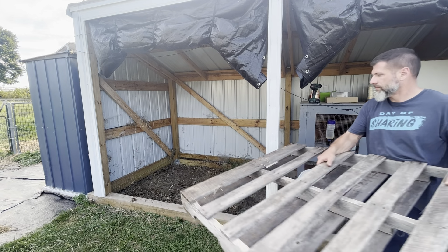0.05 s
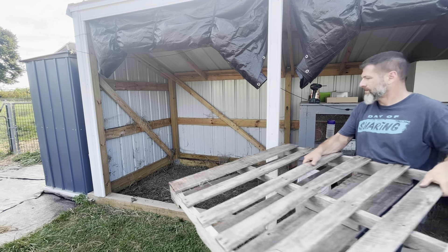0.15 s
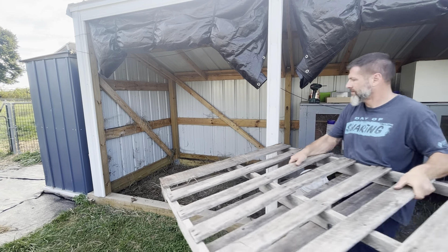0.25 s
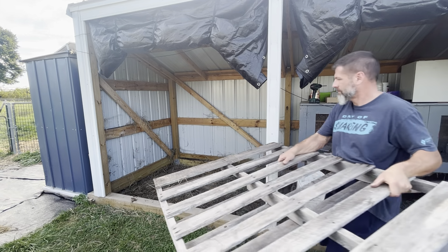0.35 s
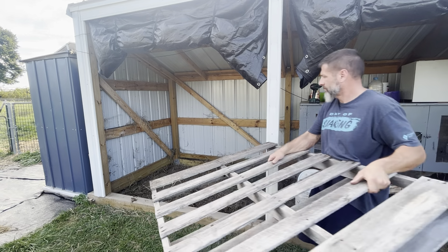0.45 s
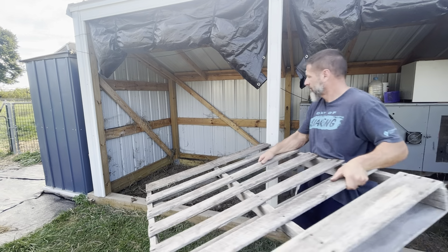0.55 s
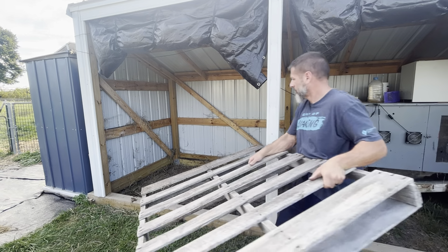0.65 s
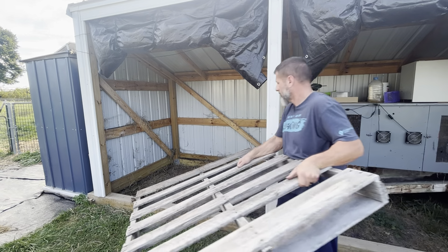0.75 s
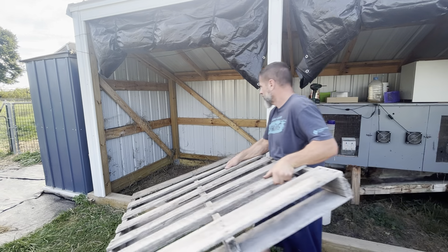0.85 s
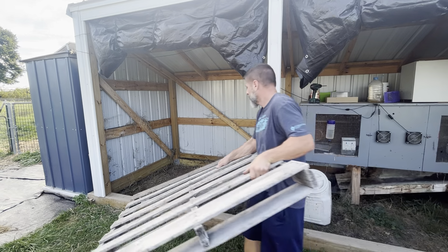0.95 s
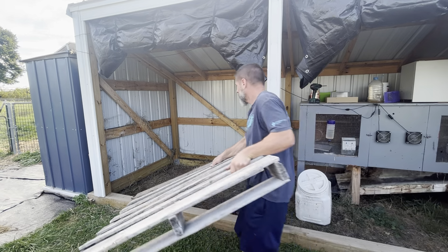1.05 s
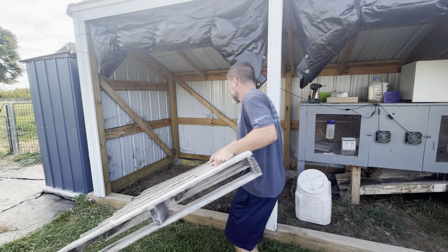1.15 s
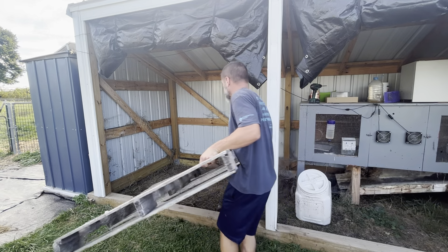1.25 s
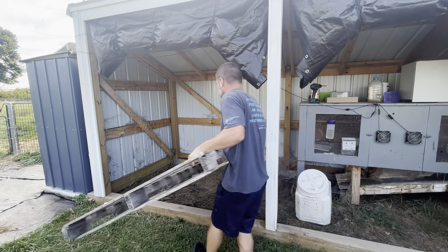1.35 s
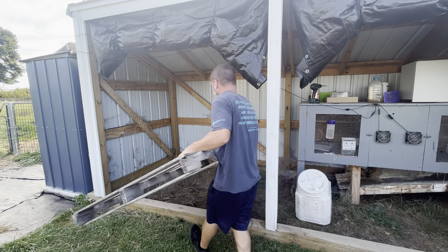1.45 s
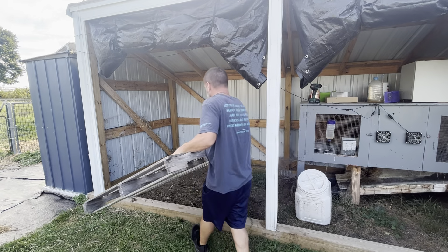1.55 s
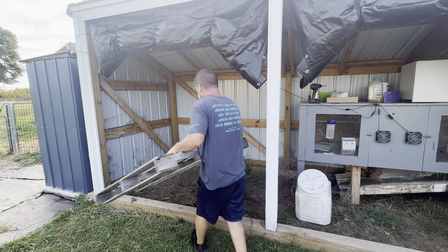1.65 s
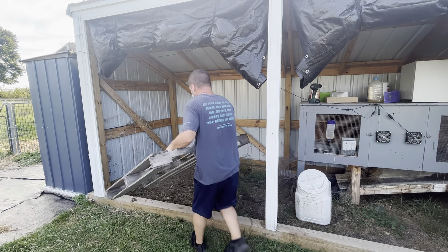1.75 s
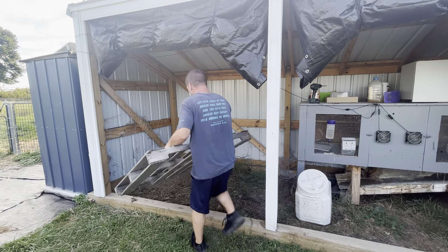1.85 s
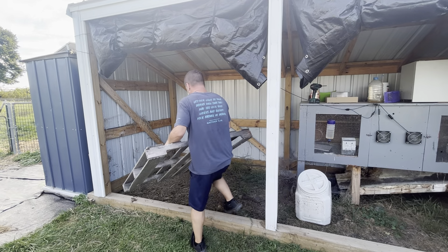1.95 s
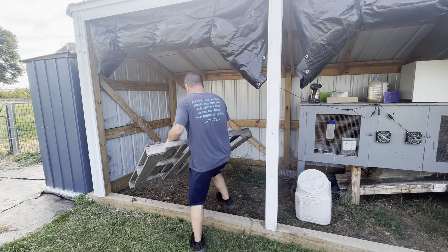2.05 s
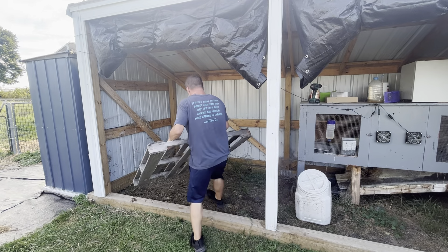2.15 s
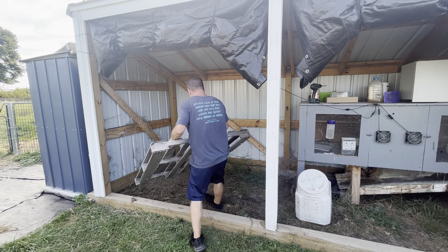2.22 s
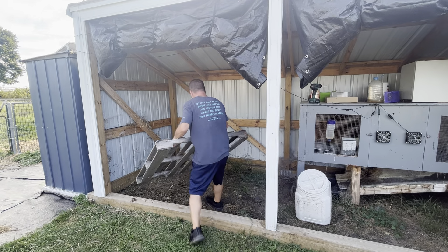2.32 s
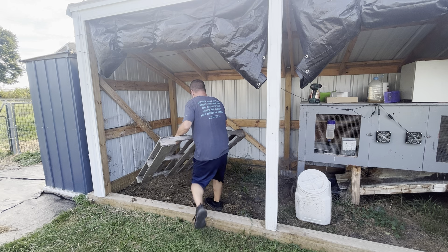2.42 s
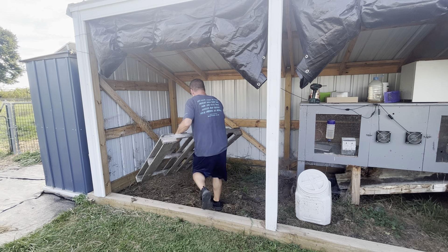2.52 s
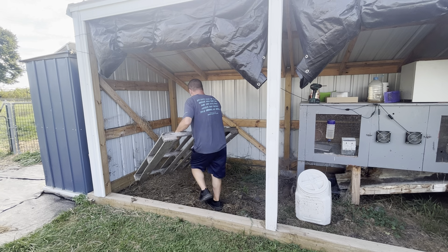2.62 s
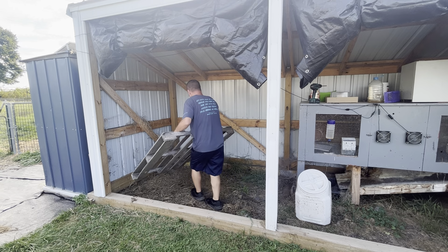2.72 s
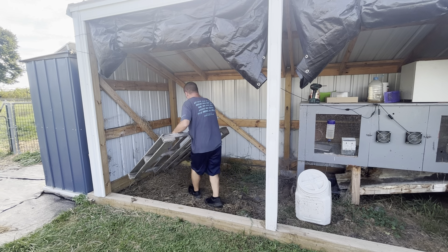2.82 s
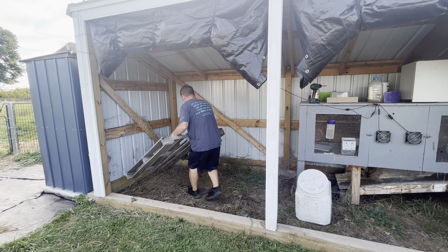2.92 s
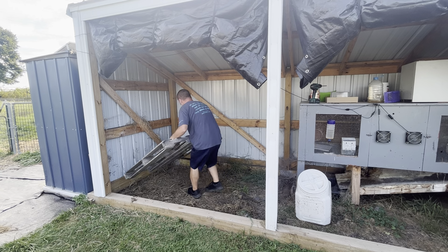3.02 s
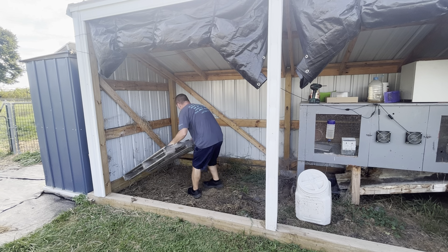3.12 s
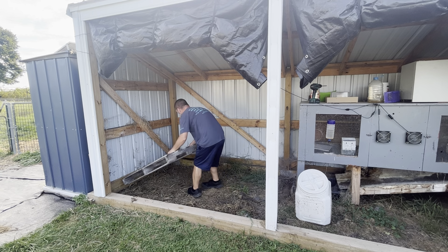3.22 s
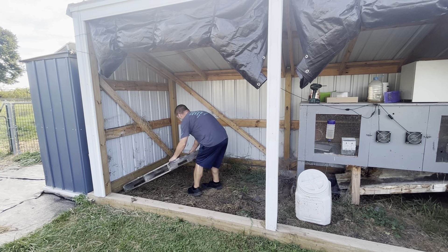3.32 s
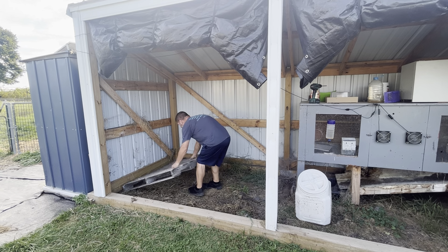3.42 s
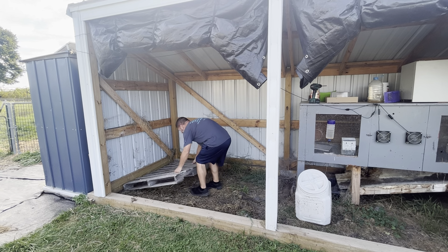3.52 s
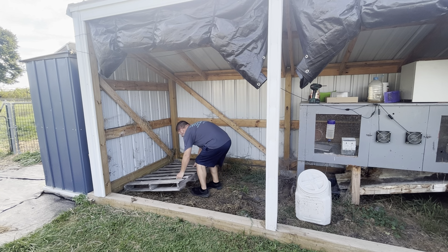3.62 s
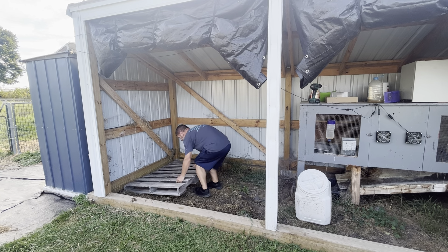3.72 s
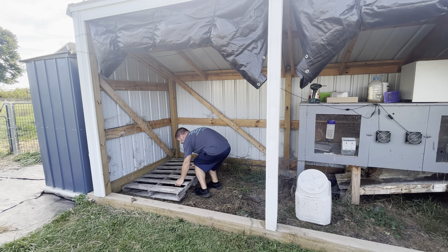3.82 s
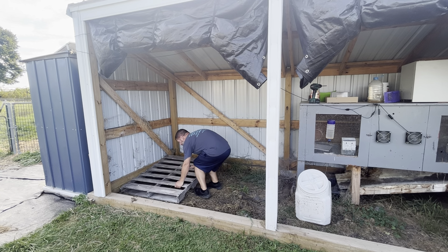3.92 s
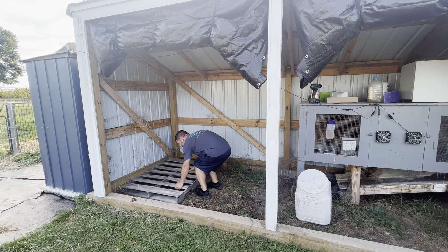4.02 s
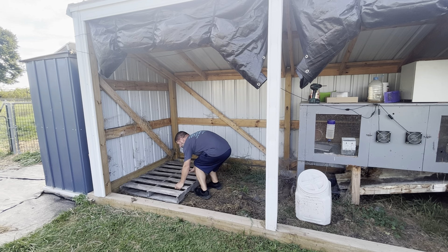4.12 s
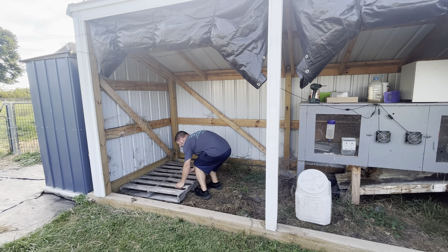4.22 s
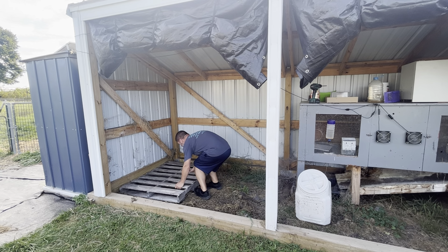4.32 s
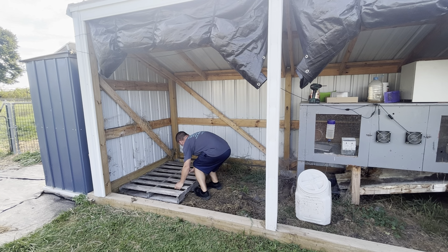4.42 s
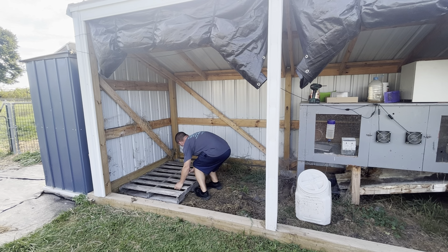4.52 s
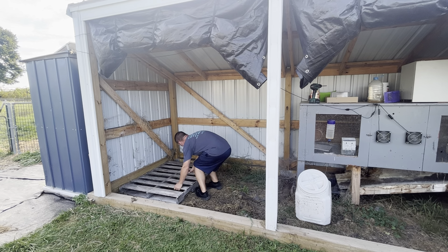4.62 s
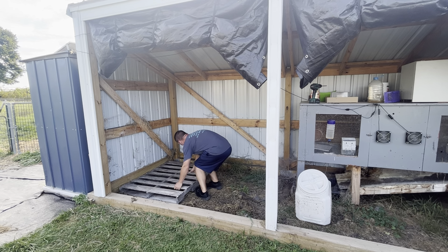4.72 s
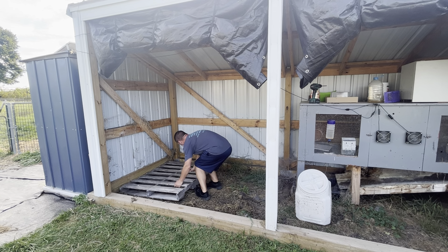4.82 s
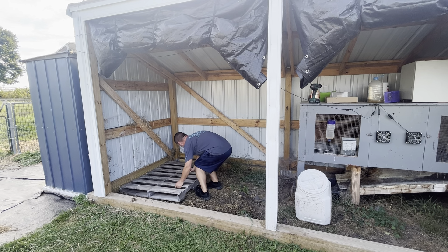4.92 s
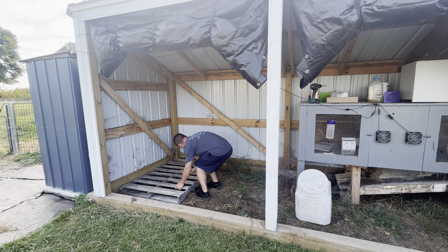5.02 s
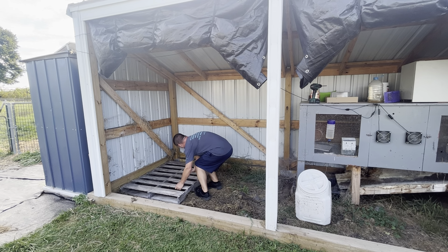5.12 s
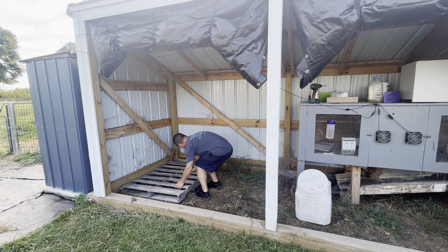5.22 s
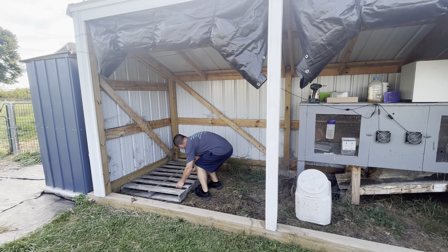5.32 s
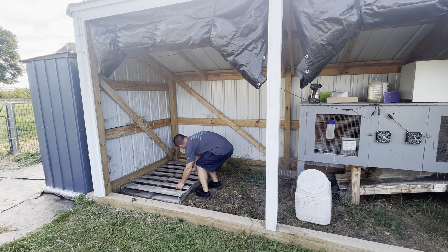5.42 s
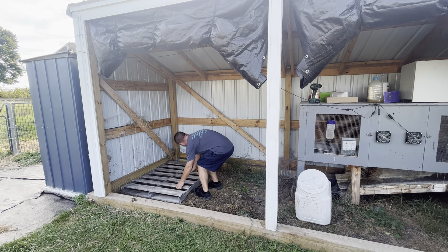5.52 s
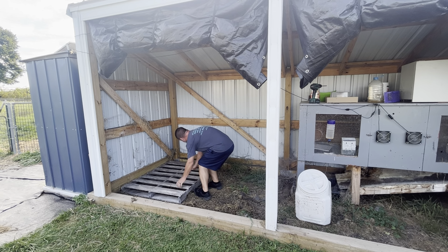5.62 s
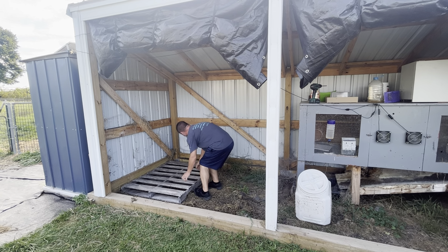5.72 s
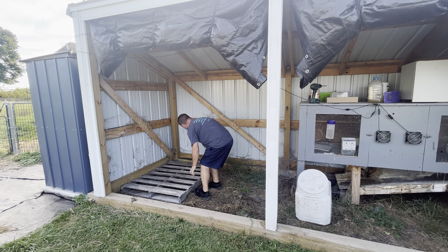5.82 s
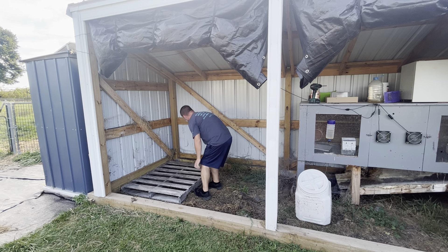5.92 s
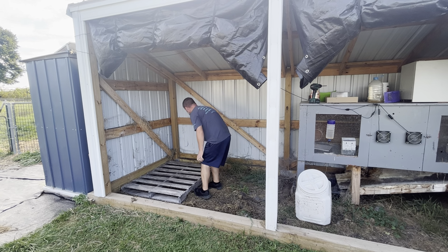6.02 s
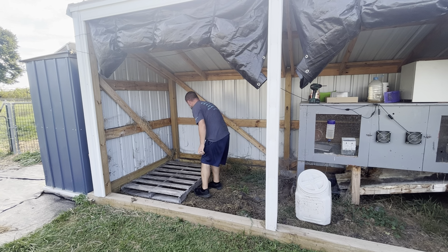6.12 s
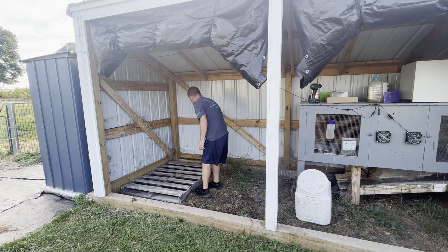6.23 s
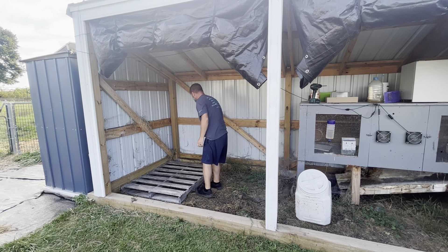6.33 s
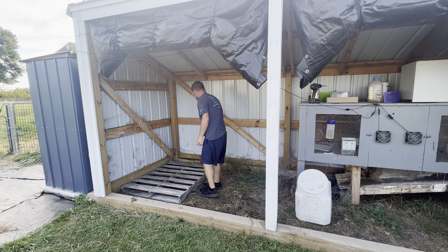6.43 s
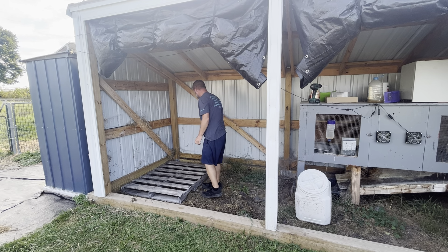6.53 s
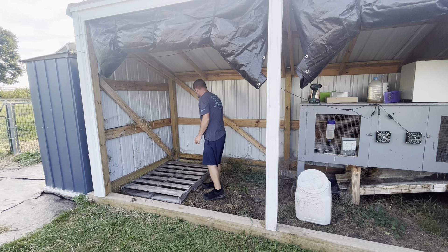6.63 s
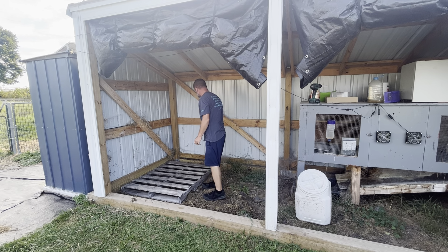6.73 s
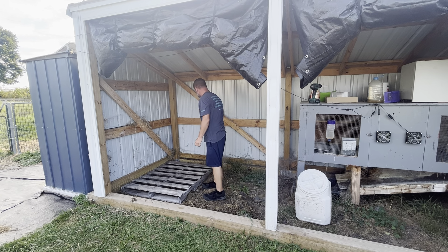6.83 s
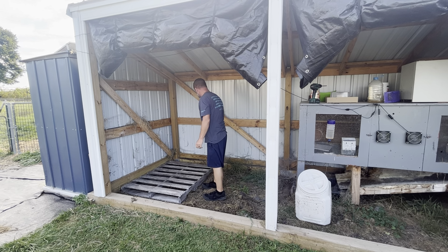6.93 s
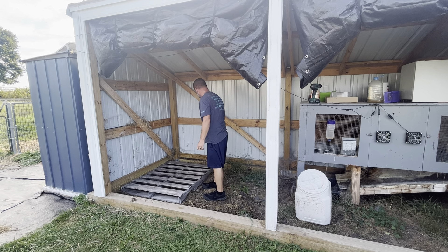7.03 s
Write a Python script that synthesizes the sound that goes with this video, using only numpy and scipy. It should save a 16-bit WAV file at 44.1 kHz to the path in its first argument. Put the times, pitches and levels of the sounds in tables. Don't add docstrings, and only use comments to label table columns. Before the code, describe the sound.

A phone in a yard picks up continuous insect song and very faint distant traffic. Someone walks quietly across grass and dirt with a pallet; its edge scrapes and taps, then knocks harder. It falls flat with a heavy wooden bang, loose slats clattering and metal walls rumbling. After a pause it is shoved twice with gritty thuds, the second stronger, and faint steps fade under the crickets.

```python
import sys
import numpy as np
from scipy import signal
from scipy.fft import rfft, irfft, next_fast_len
from scipy.io import wavfile
from scipy.ndimage import uniform_filter1d

SR = 44100
rng = np.random.default_rng(int(sys.argv[2]) if len(sys.argv) > 2 else 0)


def gain_from_decibels(decibels):
    exponent = np.asarray(decibels, float) / 20
    return 10 ** exponent


def wrap_up_sound(samples):
    columns = np.atleast_2d(samples).T
    tamed = np.clip(columns, -1, 1)
    steps = np.round(tamed * 32767).astype(np.int16)
    wavfile.write(sys.argv[1], SR, steps)


N = 311409
SIZE = next_fast_len(N)
HZ = np.arange(SIZE // 2 + 1) * SR / SIZE + 1e-3
TIME = np.arange(N) / SR


def on_hz(table, col):
    return np.interp(np.log(HZ), np.log([r[0] for r in table]), [r[col] for r in table])


def on_time(table, col):
    return np.interp(TIME, [r[0] for r in table], [r[col] for r in table])


def unit(x):
    return x / np.sqrt(np.mean(x ** 2))


def peak(x):
    return x / np.abs(x).max()


def colour(x, gain):
    return irfft(rfft(x, SIZE) * gain, SIZE)[..., :N]


def walk(rate):
    hold = int(SR / rate)
    steps = np.repeat(rng.standard_normal(N // hold + 1), hold)
    return 1.1478 * uniform_filter1d(uniform_filter1d(steps, hold), hold)[:N]


def add(out, s, x):
    i = int(s * SR)
    a = max(i, 0)
    b = max(min(i + x.shape[-1], N), a)
    out[..., a:b] += x[..., a - i:][..., :b - a]


def swells(rows):
    t = TIME[::32]
    db = [d - 10 * np.maximum((s - t) / rise, (t - s) / fall) for s, d, rise, fall in rows]
    return np.interp(TIME, t, np.sqrt(sum(gain_from_decibels(2 * np.maximum(v, -200)) for v in db)))


def ring(modes, t, centre_hz, share, octave_db, spread, scatter):
    out = np.zeros((2, len(t)))
    for hz, db, t60 in modes:
        c = rng.standard_normal((3, 2, 1))
        level = db + 1.8 * c[0] - octave_db * np.log2(hz / centre_hz) ** 2 - 60 * t / (t60 * share)
        swell = np.sin(np.pi / 2 * np.minimum(t * np.sqrt(hz) / spread, 1)) ** 2
        phase = 2 * np.pi * hz * (1 + 0.00549 * c[1]) * t - 4 * np.pi * spread * np.sqrt(hz) + scatter * c[2]
        out += gain_from_decibels(level) * swell * np.sin(phase)
    return out


def shed_tail(t, centre_hz, octave_db, above_db):
    # centre in Hz, level in dB, t60 in seconds.
    shed_bands = [(76.5, -8, 1.15), (151.15, -8, 1.72), (279, -5.5, 0.94054), (530, -10.5, 0.628),
                  (1100, -17, 0.55), (2190, -20.5, 0.61), (4278, -24.5, 0.4797), (8800, -40, 0.87)]
    out = 0
    for hz, db, t60 in shed_bands:
        sos = signal.butter(2, [hz / np.sqrt(2), hz * np.sqrt(2)], "band", fs=SR, output="sos")
        octaves = np.log2(hz / centre_hz)
        level = db - octave_db * abs(octaves) - above_db * max(octaves, 0) - 60 * t / t60
        out = out + unit(signal.sosfilt(sos, rng.standard_normal((2, len(t))))) * gain_from_decibels(level)
    rattle = gain_from_decibels(2.2 * walk(45.)[:len(t)])
    return out * rattle * (1 - np.exp(-t / 0.0041))


def frame_blows():
    # start in seconds, peak in dB, centre in Hz, ring share of board t60, shed tail in dB.
    blows = [(3.004, -38, 300, 1.1, -10), (3.375, -28.5, 198, 0.99, -24.5), (3.47, -43, 400, 1, -12),
             (3.699, -42, 387, 2.2, -12), (3.9464, -2, 420, 1.44, -14), (3.955, -7, 330, 0.8, -19),
             (3.985, -23, 250.2, 0.346, -12.5), (4.022, -21, 300, 0.53, -15),
             (4.245, -28.5, 200, 0.748, -9.5), (4.860, -24, 280, 1.5, -10), (4.921, -27, 192.5, 1.7, -13.5),
             (5.3245, -17, 340, 1.2, -12), (5.330, -19, 270, 1.0, -18), (5.345, -20, 320, 1.744, -18.5),
             (5.42, -26, 152, 1.4, -11), (5.80, -58, 150.1, 1, -19)]
    # frequency in Hz, level in dB, t60 in seconds.
    boards = [(119, -1, 0.22), (162.87, -9, 0.29), (178, 3, 0.17), (224, 0, 0.12), (270, 1.5, 0.11),
              (306.45, 5, 0.16), (362, 5, 0.12265), (420, -10, 0.1), (468, -4, 0.098), (508, 5, 0.19),
              (571, 2.5, 0.049), (660, 2, 0.17), (843, 0, .09), (1000, 8, .08)]
    out, t = np.zeros((2, N)), np.arange(2 * SR) / SR
    tail = shed_tail(t, 370.0, 0.6, 4.0)
    for s, db, hz, share, tail_db in blows:
        add(out, s, peak(ring(boards, t[:SR // 3], hz, share, 11.0, .13, .6)) * gain_from_decibels(db))
        add(out, s, tail * gain_from_decibels(db + tail_db - 0.5))
        tail = tail[::-1] * [[1], [-1]]
    return out


def wall_booms():
    # start in seconds, peak in dB.
    booms = [
        (3.9457, -30.5),
        (3.985, -33),
        (4.245, -38),
        (4.88, -38),
        (5.35, -36),
        (5.8, -44),
    ]
    # frequency in Hz, level in dB, t60 in seconds.
    walls = [(44.056, 15, 2.46), (63, -5, 1.8), (76.6, -7, 1.4), (93, 11, 1.7743), (110.63, 2, .9)]
    out, t = np.zeros((2, N)), np.arange(2 * SR) / SR
    for s, db in booms:
        sway = gain_from_decibels(2.7 * walk(9.)[:len(t)])
        add(out, s, peak(ring(walls, t, 60., 1, 0.50028, 0.35, 1.66)) * sway * gain_from_decibels(db))
    return out


def slat_cracks():
    # start in seconds, peak in dB, centre in Hz, length in seconds, shed tail in dB.
    cracks = [(2.757, -31.5, 1300, 0.019, -19), (2.776, -40, 596, 0.038, -30),
              (3.005, -54, 3000, 0.034, -41), (3.067, -45, 1750, .02, -40), (3.112, -42, 1500, 0.0316, -54),
              (3.351, -28, 2000, 0.03, -14), (3.358, -23, 800, 0.04, -35), (3.465, -42, 897.1, 0.04, -11),
              (3.54, -41.5, 2010, 0.015, -40), (3.9445, -12, 900, 0.04, -16), (3.991, -30, 2000, .03, -11),
              (4.107, -33.5, 3050, .02, -4), (4.86, -50, 1500, 0.022, -12), (5.372, -19, 2790, 0.016, -20),
              (5.373, -22, 850, 0.035, -24), (5.741, -58, 1000, 0.016, -10)]
    # frequency in Hz, level in dB, t60 in seconds.
    slats = [(783.1, 13.5, 0.025), (1130, -1, 0.059), (1300, 5, 0.012), (1500, 7, 0.032), (1830, 4.5, 0.04),
             (2059.1, 8.5, 0.043), (2295.6, 8.5, 0.01042), (2632.3, 10, 0.033), (2820, 4, 0.0216),
             (3216.3, 13, 0.0059), (4213.5, -21, 0.01305), (5080, -1, 0.045)]
    out, t = np.zeros((2, N)), np.arange(8192) / SR
    tail = shed_tail(np.arange(SR) / SR, 1350.0, 8.0, 0.1)
    for s, db, hz, length, tail_db in cracks:
        slips = rng.standard_normal((2, len(t))) * gain_from_decibels(2.1 * rng.exponential(size=len(t)))
        slips *= np.exp(-t / (.5 * length)) * np.minimum(t / (0.11 * length), 1)
        contact = np.exp(-t * hz * 1.05) * np.sin(2 * np.pi * hz * t)
        body = ring(slats, t, hz, 0.45, 5.4, 0.01003, 2.43) + gain_from_decibels(19) * contact
        body[:, :8] += gain_from_decibels(9) * np.hanning(6)[[0, 1, 2, 3, 4, 5, 5, 5]]
        add(out, s, peak(signal.fftconvolve(body, slips, axes=1)) * gain_from_decibels(db))
        add(out, s, tail * gain_from_decibels(db + tail_db + 14))
        tail = tail[::-1] * [[1], [-1]]
    return out


def board_knocks():
    # start in seconds, peak in dB, centre in Hz, ring share of t60.
    taps = [(1.645, -56, 2000, .2), (1.663, -56, 2000, .2), (3.3545, -33, 2100, .5),
            (3.3605, -18, 1950, .9), (3.3675, -22, 1200, .8), (3.377, -23.5, 1900, .8),
            (3.534, -41, 2000, .5), (3.9475, -15, 900, .7), (3.966, -22, 1500, 1), (3.986, -24, 2200, .8),
            (4.003, -25, 1400, 1), (4.038, -25, 800, 1), (4.079, -29, 900, 1), (4.105, -28, 1700, 1),
            (4.176, -32, 2000, 1), (4.214, -33, 1100, 1), (4.246, -36, 1450, 1), (4.287, -39, 960, 1),
            (4.311, -38, 1450, 1), (4.348, -43, 830, 1), (4.398, -43, 790, 1), (5.373, -19, 2500, .8),
            (5.376, -21, 1300, .7), (5.382, -24, 2700, .7), (5.738, -47, 1100, 1)]
    # frequency in Hz, level in dB, t60 in seconds.
    planks = [(705, -6, .08), (899, -4, .12), (965, -4, .2), (1104, -1, .087), (1190, 0, .12),
              (1410, -6, .18), (1560, -4, .1), (1750, -5, .12), (1879, -4, .14), (2046, -2, .14),
              (2200, -8, .15), (2525, -2, .055), (2790, -5, .075), (3250, -4, .06)]
    out, t = np.zeros((2, N)), np.arange(8192) / SR
    for s, db, hz, share in taps:
        contact = np.exp(-t * hz * 1.2) * np.sin(2 * np.pi * hz * t)
        add(out, s, peak(ring(planks, t, hz, share, 7.0, .02, 2.5) + gain_from_decibels(6) * contact) * gain_from_decibels(db))
    return out


def drag(sign):
    # time in seconds, level in dB, brightness in dB,
    # seconds to fade 10 dB either side.
    footfalls = [(.08, -70, -1, .2), (.38, -76, 2, .04), (.72, -75.5, 5, .15), (.95, -73, 0, .1),
                 (1.2, -75, -3, .25), (1.5, -71, 8, 0.07), (1.585, -72, 5, .04), (1.66, -69.5, -3.5, 0.1),
                 (1.85, -77.5, -3, 0.7), (2.24, -60, -1, .04), (2.36, -64.5, 2, 0.0623),
                 (2.5, -72.5, -2, 0.16), (3.254, -66, 2, 0.0873), (3.605, -74, 7, 0.09),
                 (4.604, -59, 2.5, .08), (5.03, -56.5, 3.5, .06), (6.03, -77.5, 1.5, 0.217),
                 (6.31, -77, 2, 0.228), (6.668, -74.5, 3.5, 0.17), (7.05, -81, 5, 0.2766)]
    # time in seconds, level in dB, brightness in dB,
    # seconds to rise 10 dB, seconds to fall 10 dB.
    drags = [(2.765, -51.5, 4, 0.0139, 0.07), (2.795, -54, 3, 0.02, 0.04), (3.02, -64.5, 8, .02, .08),
             (3.125, -62, 3.5, .08, .05), (3.36, -60, 10.5, 0.04, 0.13), (3.372, -49, 4.5, .01, .045),
             (3.43, -59, 1.5, 0.02, 0.17), (3.53, -56.5, 0, .1, 0.0013), (3.86, -56.5, 3.5, 0.21, 0.17),
             (3.93, -56.5, 5, .1, 0.05), (3.98, -39, -10.5, 0.0153, 0.12), (4.172, -49, -9.5, .02, 0.132),
             (4.76, -67.5, 4.5, .15, 0.25), (4.865, -57, 0, .006, 0.08), (4.965, -58, 0, .06, .06),
             (5.2, -67, 5, 0.3, 0.15), (5.335, -58, -2, 0.012, .06), (5.385, -47, -4, .01, .05),
             (5.41, -58, -0.5, 0.0794, 0.0063), (5.528, -67.5, -3, 0.3, 0.1)]
    rows = [(s, db, tilt, fade, fade) for s, db, tilt, fade in footfalls] + drags
    return swells([(s, db + sign * tilt, rise, fall) for s, db, tilt, rise, fall in rows])


def grit():
    # frequency in Hz, density in dB per Hz.
    grit_colour = [(180, -51), (300, -5.5), (371, 1), (523, -9), (1400, -8.5), (3730, -17), (8320, -18),
                   (13400, -22), (15000, -58)]
    patchy = 1.2 * walk(40)
    grains = rng.standard_normal((2, N)) * gain_from_decibels(2.4748 * rng.exponential(size=N) + patchy)
    gain = gain_from_decibels(on_hz(grit_colour, 1))
    middle = (HZ > 2300) & (HZ < 4000)
    grains = grains / np.sqrt(np.mean(colour(grains, gain * middle) ** 2))
    dull = 1 / (1 + (HZ / 2500) ** 2)
    dull_share = colour(grains, gain * dull) * drag(-1.03)
    bright_share = colour(grains, gain * (1 - dull)) * drag(0.97)
    return (dull_share + bright_share) * gain_from_decibels(-2.5)


def stalk_snaps():
    # start in seconds, peak in dB.
    ticks = [
        (1.4846, -44),
        (1.5086, -35),
        (1.5868, -28),
        (2.4768, -42),
        (2.6908, -43),
        (2.7646, -33),
        (3.0026, -44),
        (3.1682, -31),
        (3.3383, -44),
        (3.5973, -31),
    ]
    out, t = np.zeros((2, N)), np.arange(400) / SR
    for s, db in ticks:
        add(out, s, np.diff(rng.standard_normal((2, 401))) * np.exp(-t / 0.0011) * gain_from_decibels(db - 12))
    return out


def stroke(hz, fall_hz, length, rough):
    u = np.arange(int(length * SR)) / (length * SR)
    phase = 2 * np.pi * np.cumsum(hz - fall_hz * (u ** 2.19 - .3)) / SR + 2 * np.pi * rng.random()
    teeth = 1 + rough * np.convolve(rng.standard_normal(len(u)), np.hanning(120), "same") / np.sqrt(45)
    tone = np.sin(np.pi * u ** 1.11) ** 1.37 * teeth * np.sin(phase)
    out = np.r_[tone, 0 * tone, 0 * tone]
    return out + gain_from_decibels(-11.5) * np.roll(out, len(u) // 2) + gain_from_decibels(-16.5) * np.roll(out, len(u) * 5 // 4)


def ground_cricket():
    # first stroke in seconds, strokes, period in seconds, seconds gained by the hurried opening.
    trill = [
        (0.04, 4, .0587, 0),
        (0.777, 58, .05635, .018),
        (4.558, 46, .056, .027),
    ]
    # time in seconds, level in dB.
    trill_db = [(.2, -39.5), (.78, -43), (2.7, -40), (3.0, -39), (3.97, -38.3), (4.56, -44), (5.9, -37.5),
                (7.0, -35)]
    out = np.zeros((2, N))
    for start, strokes, period, gained in trill:
        for j in range(strokes):
            s = start + j * period - gained * (1 - np.exp(-j / 2.5))
            db = np.interp(s, *np.transpose(trill_db))
            hz = 8070 + 20 * (db + 40)
            c = rng.standard_normal(2)
            tone = stroke(hz, 170., .017, 0.18564) * gain_from_decibels(db + 0.5 + 0.6 * c[0])
            add(out, s - .009 + .0008 * c[1], tone * gain_from_decibels([[-14], [0]]))
    return out


def near_field_cricket():
    # last stroke in seconds, level in dB.
    chirps = [(0.007, -44), (0.332, -45.5), (0.684, -45), (0.966, -46.5), (1.332, -45), (1.654, -45),
              (1.954, -45), (2.306, -45.5), (2.602, -44.5), (2.931, -45.5), (3.23, -45), (3.519, -44.5),
              (3.842, -45.5), (4.1, -54), (4.352, -45), (4.665, -44), (5.04, -43.5), (5.316, -44),
              (5.731, -45.5), (6.014, -44), (6.361, -45.5), (6.653, -43.5), (7.003, -44)]
    # seconds before the end, level in dB.
    chirp_strokes = [
        (.078, -1.5),
        (.041, -.2),
        (.0017, .2),
        (-.055, -12.5),
    ]
    out = np.zeros((2, N))
    for s, db in chirps:
        for lead, step_db in chirp_strokes:
            tone = stroke(4846.0 + 42.05 * rng.standard_normal(), 750., 0.024, 0.11)
            level = gain_from_decibels(db + step_db + 1.0 + .7 * rng.standard_normal())
            add(out, s - lead - .0145, tone * level * gain_from_decibels([[1.2], [-1.2]]))
    return out


def far_field_crickets():
    # last stroke in seconds, level in dB.
    far_chirps = [(.149, -50), (.445, -50), (0.963, -50), (1.397, -49), (1.686, -52.5), (2.044, -51),
                  (2.377, -51), (2.723, -52.5), (3.019, -50.5), (3.727, -52), (5.238, -56), (5.951, -54),
                  (6.303, -50.5), (6.934, -52)]
    out = np.zeros((2, N))
    for s, db in far_chirps:
        for lead in (.077, .039, 0):
            tone = stroke(5430., 350., .02, .3) * gain_from_decibels(-5)
            level = gain_from_decibels(db - 37 * lead + rng.standard_normal())
            add(out, s - lead - .011, tone * level * gain_from_decibels([[1.1], [-1.1]]))
    for place, pitch, size in rng.random((50, 3)):
        for lead in (.076, .038, 0):
            tone = stroke(4600. + 500. * pitch, 500., .02, .3) * gain_from_decibels(-55 - 6 * size)
            add(out, place * N / SR - lead, tone * gain_from_decibels([[2.5], [-2.5]]))
    return out


def bed(spectrum, lo_hz, hi_hz, count, flicker_db, rate):
    out, gain = 0, gain_from_decibels(on_hz(spectrum, 1))
    edges = np.geomspace(spectrum[0][0], spectrum[-1][0], count + 1)
    source = colour(rng.standard_normal((2, N)), gain)
    for a, b in zip(edges, edges[1:]):
        out = out + colour(source, (HZ >= a) & (HZ < b)) * gain_from_decibels(flicker_db * walk(rate))
    return out / np.sqrt(np.mean(colour(out[0], (HZ > lo_hz) & (HZ < hi_hz)) ** 2))


def insect_chorus():
    # frequency in Hz, density in dB per Hz.
    chorus = [(2240, -63.5), (3800, -33), (4670, -1.5), (4900, -1.5), (5340, -5), (5710, -60), (6040, -66),
              (6360, -28), (7380, -3), (8420, 3.5), (8950, -1.5), (10100, -21), (10500, -54), (10800, -56),
              (14000, -78), (22000, -120)]
    return bed(chorus, 8549, 9130, count=8, flicker_db=1.5, rate=25.) * gain_from_decibels(-59.5)


def grass_rustle():
    # frequency in Hz, density in dB per Hz.
    rustle = [(10200, -16), (11000, -3), (12500, 0), (14000, 5), (14600, -14.5)]
    stirring = np.minimum(drag(1) * gain_from_decibels(-9.5), gain_from_decibels(-73))
    return bed(rustle, 10418, 13850, count=2, flicker_db=6.0, rate=5.5) * stirring


def resonance(hz, width):
    return unit(colour(rng.standard_normal((2, N)), 1 / (1 + ((HZ - hz) / width) ** 2)))


def fan_hum():
    # time in seconds, level in dB.
    fan_db = [(0, -57), (.5, -54), (1.8, -69), (2.2, -56.5), (2.8, -62), (4.5, -49), (6.1, -57),
              (7.06, -54)]
    hum_hz = 91.5
    line = np.sin(2 * np.pi * np.cumsum(hum_hz + 1.4981 * walk(4.0)) / SR)
    hum = unit(line + 0.7 * resonance(hum_hz, 4.6))
    return hum * gain_from_decibels(on_time(fan_db, 1) + 2.8 * walk(7.9))


def far_vehicles():
    # time in seconds, level in dB, seconds to fade 10 dB.
    passes = [
        (.1, -63, 1.198),
        (1.45, -56, 0.7682),
        (4.5, -55.5, 0.63),
        (6.58, -55, 0.54),
    ]
    drone = resonance(193, 35.5) * swells([(s, db, fade, fade) for s, db, fade in passes])
    wash = resonance(970, 170) * swells([(0.9, -68.5, 4, 2.0)])
    return drone + wash


def open_air():
    # frequency in Hz, density in dB per Hz.
    air = [(15, -49), (25, -22.5), (69, -2), (102, -3), (165, -9), (306, -19), (363, -19), (510, -23.5),
           (763, -21), (1220, -25), (1440, -21.5), (1780, -24), (2560, -45.5), (4000, -49), (5200, -75),
           (8800, -120)]
    return bed(air, 30, 300, count=8, flicker_db=1.64, rate=2.08) * gain_from_decibels(-54.5)


def ports(pair, table):
    a, b = rfft(pair, SIZE)
    like = np.clip(on_hz(table, 1), 0, 1)
    half = gain_from_decibels(on_hz(table, 3) / 2) * np.exp(.5j * on_hz(table, 2))
    left = a * half
    right = (like * a + np.sqrt(1 - like ** 2) * b) / half
    return irfft(np.array([left, right]), SIZE)[:, :N]


def scene():
    # frequency in Hz, likeness 0-1, left lead in radians,
    # left minus right in dB.
    ports_shed = [(61.01, 1, 0, -0.5), (133.22, 1, 0.61, 0.5), (400, 0.72, -0.8, -2.5),
                  (642, 0.6, -4.3, -8), (1300, 0.54, -5, -3.5), (2357.6, 0.42, -6, -2), (4400, 0.55, -5, 3),
                  (7977, 1, -4.5, -9), (15000, 0.85, -5.3, 2.5)]
    # frequency in Hz, likeness 0-1, left lead in radians,
    # left minus right in dB.
    ports_air = [(50.22, 1, 0, -2.5), (135, 1, 0.67, -0.7), (300, 0.7418, -1.5, -4.5),
                 (758.58, 0.85, -2.5, 0.7), (1444, 0.25, -2, 5.5), (3140, .4, -3.5, 7),
                 (4660, 0.5726, 1.9038, 7.5), (7006.4, 0.46, 3, -1.5), (9630, .4, 2.5, -12.5),
                 (15000, .4, 8.5, 6.5)]
    pallet = frame_blows() + wall_booms() + slat_cracks() + board_knocks()
    ground = grit() + stalk_snaps()
    crickets = ground_cricket() + near_field_cricket() + far_field_crickets()
    outside = insect_chorus() + grass_rustle() + fan_hum() + far_vehicles() + open_air()
    return ports(pallet + ground, ports_shed) + crickets + ports(outside, ports_air)


def roll_off(x):
    return signal.sosfilt(signal.butter(12, 15710, fs=SR, output="sos"), x)


def record(dry):
    rounded = dry / (1 + (dry / .95) ** 6) ** (1 / 6)
    edges = 1 / np.sqrt((1 + (30 / HZ) ** 8) * (1 + (HZ / 14300) ** 40))
    return roll_off(colour(rounded, edges))


dry = scene()
out = record(dry)
wrap_up_sound(out)
```